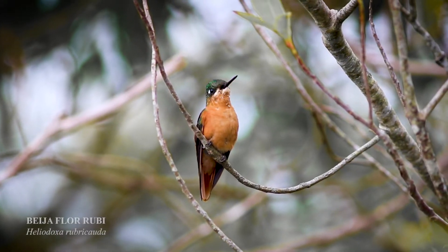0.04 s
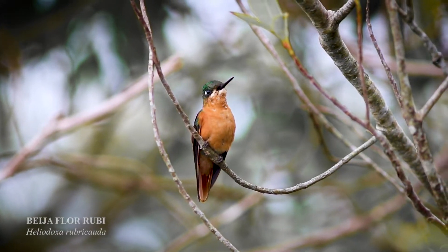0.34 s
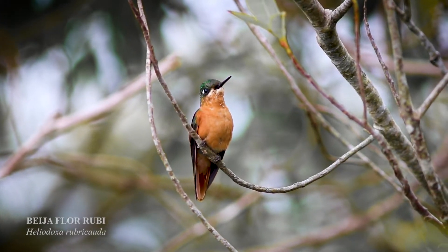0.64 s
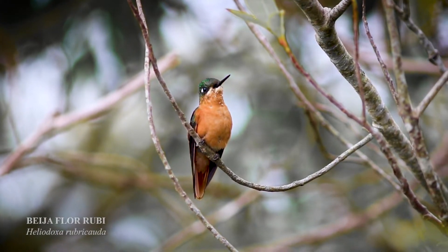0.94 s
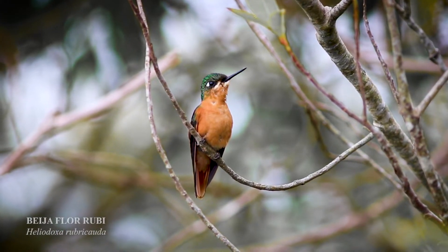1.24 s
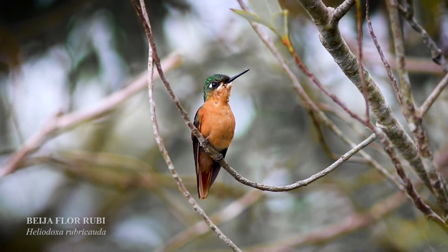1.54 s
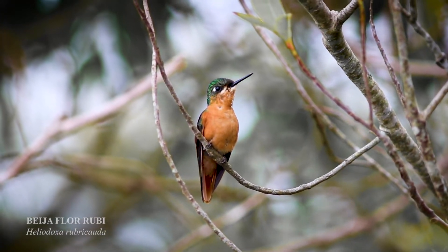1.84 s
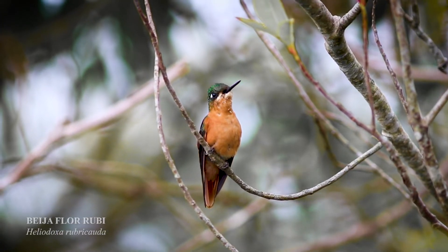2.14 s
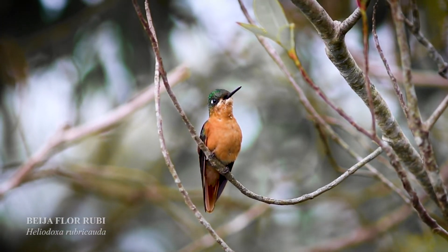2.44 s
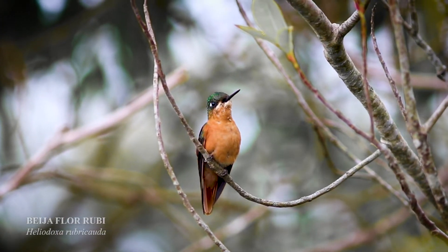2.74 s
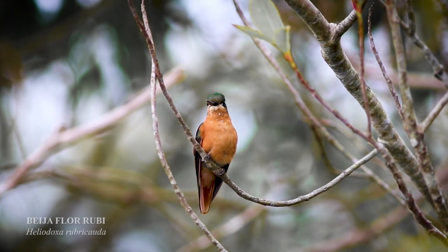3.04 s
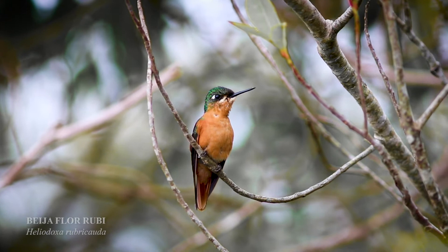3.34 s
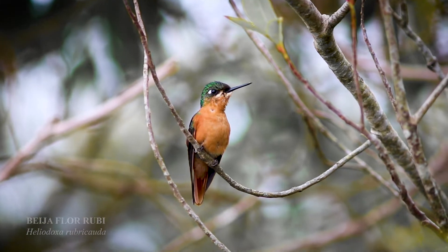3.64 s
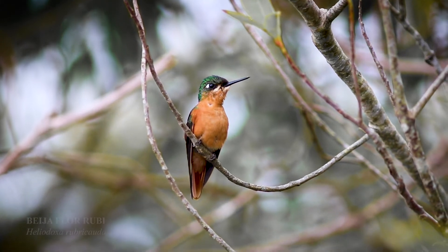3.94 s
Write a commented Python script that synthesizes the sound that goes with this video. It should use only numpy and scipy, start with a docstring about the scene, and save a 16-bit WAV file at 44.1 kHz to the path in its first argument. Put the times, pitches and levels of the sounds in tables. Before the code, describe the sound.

Insects rasp in a steady high chorus while a small bird warbles quickly.

```python
"""Insects and birds at a forest edge.

Insect stroke trains ring wing resonances near 4.6 and 6.5 kHz; crickets add thin pulsed trills.
A small bird warbles quick glides, a farther one chirps high, one call buzzes. Twigs tick, leaves rustle.
Trees scatter the calls over a wash of distant air and two faint tones that fade early. Almost mono."""
import sys
import numpy as np
from scipy import signal
from scipy.fft import rfft, irfft
from scipy.io import wavfile
from scipy.ndimage import uniform_filter1d

SR = 44100
rng = np.random.default_rng(int(sys.argv[2]) if len(sys.argv) > 2 else 0)


def transcribe(u):
    """Save the signal u as a 16-bit wav file named by the first command-line argument.

    u: samples, shape (n,) or (channels, n), limited to [-1, 1]; the rate is SR.
    q: integer samples, one column per channel.
    """
    v = np.clip(np.atleast_2d(u).T, -1, 1)
    q = np.round(v * 32767).astype(np.int16)
    wavfile.write(sys.argv[1], SR, q)


N = 176400

# distant air and hiss: freq_hz, gain_db
AIR_SPECTRUM = [(25, -22), (55, -24), (90, -11), (130, -4), (200, 1.5), (350, 1), (700, -1.5), (1500, -2),
                (2800, -2.5), (5500, -2.5), (7500, -6.5), (8500, -7.5), (9150, -4.5), (10200, -10),
                (12000, -11), (14200, -6), (15300, -15)]
# air, side relative to mid: freq_hz, gain_db
AIR_SIDE_SPECTRUM = [(30, -4), (120, -20), (300, -20.5), (700, -15), (2800, -17), (4500, -57), (15000, -33)]
# deep rumble: freq_hz, gain_db
RUMBLE_SPECTRUM = [(10, -10), (25, -6), (50, -2), (80, 4), (130, -24), (400, -60)]
# faint far tones: pitch_hz, end_s, level_db
FADING_TONES = [(561, 0.56, -59.5), (1340, 0.65, -60)]
# rasping insects: stroke_rate_hz, relative_db
RASPING_INSECTS = [(33.65, -9), (77.4, -6), (96.6, -12), (58.72, -5.5), (169.45, -9)]
# wing resonance, low chorus: freq_hz, gain_db
LOW_WING_RESONANCE = [(4100, -35.5), (4290, -17), (4385, -6.5), (4440, -3.5), (4620, 1.5), (4830, -5.5),
                      (4920, -11), (5080, -26), (5300, -30.5)]
# wing resonance, high chorus: freq_hz, gain_db
HIGH_WING_RESONANCE = [(5700, -35), (6000, 0), (6130, -7), (6340, 4), (6630, 1), (6880, 0.5), (7050, -11),
                       (7500, -9), (7800, -30)]
# low chorus loudness: time_s, level_db
LOW_CHORUS_ENVELOPE = [(0, -36.5), (.6, -36), (1.4, -35.5), (1.9, -37), (2.6, -37.6), (2.82, -33.5),
                       (3.2, -35), (3.48, -34.5), (3.66, -40), (3.82, -34), (3.92, -41.5)]
# cricket trills: pitch_hz, pulse_rate_hz, level_db
CRICKET_TRILLS = [(4444, 10.3, -44.5), (4615, 34, -44), (5310, 28, -66), (6014, 17, -58), (6335, 40, -60),
                  (6868, 22, -62), (7390, 30, -66), (9260, 45, -64)]
# warbled notes: start_s, length_s, start_hz, middle_hz, end_hz, relative_db
WARBLE_NOTES = [ (0.19, 0.036, 3230, 2900, 2550, -52), (0.26, 0.057, 2680, 3370, 3500, -48),
                (0.366, 0.052, 2270, 2700, 2450, -47), (0.427, 0.041, 3300, 2950, 2320, -46.5),
                (0.551, 0.061, 2680, 3460, 2700, -46), (0.601, 0.051, 2700, 2455, 3640, -45.5),
                (0.777, 0.043, 2010, 2800, 2200, -43.5), (0.864, .058, 2720, 3280, 4050, -44.5),
                (0.958, 0.043, 3690, 2920, 2150, -41.5), (1.013, 0.032, 2260, 2730, 3100, -43.5),
                (1.108, 0.062, 2510, 3130, 2210, -40.5), (1.18, 0.043, 3100, 3600, 3670, -44.5),
                (1.379, 0.034, 2330, 2880, 3420, -39.5), (1.427, 0.034, 3210, 2830, 2200, -38),
                (1.478, 0.049, 3350, 3410, 3880, -43), (1.67, 0.045, 1760, 2620, 1920, -40.5),
                (1.797, 0.043, 3190, 2895, 2290, -38), (1.857, 0.028, 3200, 2495, 3130, -48),
                (1.881, 0.039, 3280, 3560, 3700, -42.5), (1.983, 0.025, 3300, 2840, 2250, -44.5),
                (2.005, 0.027, 2360, 2860, 3170, -41.5), (2.115, 0.046, 2475, 3090, 2950, -41.5),
                (2.151, 0.039, 3090, 2820, 3100, -37.5), (2.313, 0.038, 1980, 2680, 1920, -41),
                (2.345, .024, 2000, 2935, 3330, -40.5), (2.405, 0.022, 3200, 2990, 2330, -40),
                (2.431, 0.054, 2400, 3110, 2380, -39), (2.606, .042, 1910, 2390, 1900, -49.5),
                (2.69, 0.033, 3080, 2900, 2250, -41), (2.732, .068, 2345, 3225, 2400, -43.5),
                (2.802, 0.021, 2290, 2520, 2580, -41.5), (2.937, 0.03, 2080, 2630, 2200, -39),
                (2.97, 0.025, 2500, 3000, 3100, -42), (3.022, 0.023, 2780, 2960, 2380, -39),
                (3.059, 0.029, 2050, 2470, 3450, -43), (3.082, 0.043, 3390, 3446, 3780, -40),
                (3.296, .048, 1980, 2510, 1950, -44.5), (3.418, 0.034, 3030, 2850, 2420, -38.5),
                (3.468, 0.026, 2520, 2980, 2400, -40), (3.494, 0.034, 2574, 3220, 3440, -43),
                (3.754, 0.038, 2440, 2860, 3120, -49), (3.808, 0.019, 3070, 2730, 2380, -47),
                (3.845, 0.044, 2460, 3020, 3000, -48), (3.89, 0.026, 4300, 3850, 3300, -47)]
# soft low notes between phrases: start_s, pitch_hz, relative_db
MURMUR_NOTES = [(.725, 2000, -51), (1.30, 2200, -47), (1.615, 1856, -52.5), (2.56, 1750, -59),
                (2.90, 2010, -54), (3.245, 1850, -50.5), (3.675, 2190, -51)]
# warbler's direct sound, half hidden by leaves at first: time_s, gain_db
WARBLER_DIRECT_GAIN = [(.6, -1.5), (1.6, 0)]
# twig ticks and leaf rustles: start_s, rise_s, decay_s, level_db, body_relative_db
RUSTLE_BURSTS = [(.379, .0004, 0.0014, -29, -20), (.380, .001, .018, -40, -17),
                 (.648, 0.0055, .014, -42, -14), (.795, .006, .014, -44, -14), (.955, .012, .03, -43, -15),
                 (3.360, 0.0015, .016, -40, -1), (3.42, 0.031, 0.048, -43, 5.5)]
# bright crackle of a rustle: freq_hz, gain_db
RUSTLE_TREBLE_SPECTRUM = [(200, -45), (900, -12), (1700, -10), (4000, 2), (9000, 7), (12000, 5.5),
                          (16000, -20)]
# lower scratch of a rustle: freq_hz, gain_db
RUSTLE_BODY_SPECTRUM = [(600, -26), (1200, -4), (1700, -1), (4000, 1), (5500, -1), (9000, -35)]
# farther bird's rising chirps: start_s, start_hz, level_db
FAR_CHIRPS = [(.905, 4300, -47.5), (1.02, 5200, -46), (1.16, 6800, -52.5), (1.295, 5900, -52),
              (1.435, 7000, -49), (1.56, 7100, -49), (1.70, 7000, -53.5), (1.825, 5900, -52.5),
              (1.975, 6800, -53)]
# hardest strokes of a near insect: time_s, peak_db
SNAP_STROKES = [(1.352, -23.5), (1.960, -22.5), (2.590, -24.5), (2.611, -22), (2.824, -21.5),
                (2.835, -22.5)]


def undb(db):
    """Decibels to gain."""
    return 10 ** (np.asarray(db) / 20)


def unit(x):
    """Scale to rms 1."""
    return x / np.sqrt(np.mean(x ** 2))


def walk(rate_hz):
    """Smooth random drift, rms 1."""
    hold = max(2, int(SR / rate_hz))
    steps = np.repeat(rng.standard_normal(N // hold + 1), hold)
    return unit(uniform_filter1d(uniform_filter1d(steps, hold), hold)[:N])


def sine(hz):
    """Sine following a pitch curve."""
    return np.sin(2 * np.pi * np.cumsum(hz) / SR)


def colour(x, spectrum):
    """Filter through a curve of freq_hz, gain_db points."""
    hz, db = np.array(spectrum).T
    bin_hz = np.maximum(np.arange(N // 2 + 1) * SR / N, 1)
    return irfft(rfft(x) * undb(np.interp(np.log(bin_hz), np.log(hz), db)), N)


def scatter(x, t60_s=0.34):
    """Diffuse echo from trunks and leaves, unit energy gain."""
    t = np.arange(SR // 2) / SR
    tail = rng.standard_normal(len(t)) * np.exp(-np.log(1000) * t / t60_s)
    return irfft(rfft(x) * rfft(tail / np.linalg.norm(tail), N), N)


def blur(x, echo_db):
    """Blend in the tree echo at about constant power."""
    return (x + undb(echo_db) * scatter(x)) / np.hypot(1, undb(echo_db))


def stereo(mid, side):
    """Mid and side to left and right."""
    return np.array([mid + side, mid - side])


def add(out, start_s, x):
    """Mix in a short sound."""
    i = max(0, int(start_s * SR))
    out[i:i + len(x)] += x[:max(0, N - i)]


def air(wash_db=-41.5, rumble_db=-73):
    """Far wash and hiss over a deep rumble, opposite in the two ears."""
    mid = undb(wash_db) * unit(colour(rng.standard_normal(N), AIR_SPECTRUM))
    side = undb(wash_db) * unit(colour(rng.standard_normal(N), AIR_SPECTRUM))
    rumble = undb(rumble_db) * unit(colour(rng.standard_normal(N), RUMBLE_SPECTRUM))
    return stereo(mid, colour(side, AIR_SIDE_SPECTRUM) + rumble)


def far_tones(t, waver=0.0114, fade_s=0.14):
    """Faint wavering tones sink into the air."""
    out = np.zeros(N)
    for hz, end_s, db in FADING_TONES:
        fade = np.clip((end_s - t) / fade_s, 0, 1)
        out += undb(db) * fade * unit(sine(hz * (1 + waver * walk(56.3))))
    return out


def chorus(wing, jitter=.07, spread_db=2.5, echo_db=5.5, max_strokes=1024):
    """Uneven stroke trains ring the wing resonance; each insect has its own path through the trees."""
    out = np.zeros(N)
    for rate_hz, db in RASPING_INSECTS:
        gap, size, offset = rng.standard_normal((max_strokes, 3)).T
        at_sample = (np.cumsum(1 + jitter * gap) - abs(offset[0])) / rate_hz * SR
        inside = (at_sample >= 0) & (at_sample < N)
        strokes = np.zeros(N)
        strokes[at_sample[inside].astype(int)] = undb(db + spread_db * size[inside])
        out += strokes + undb(echo_db) * scatter(strokes)
    return unit(colour(out, wing))


def crickets(rate_drift=0.0988, pitch_drift=.003):
    """Single crickets pulse on nearly pure, drifting pitches."""
    out = np.zeros(N)
    for hz, rate_hz, db in CRICKET_TRILLS:
        pulse_hz = rate_hz * (1 + rate_drift * walk(6))
        pulses = sine(pulse_hz / 2) ** 2
        tone = sine(hz * (1 + pitch_drift * walk(50)))
        out += undb(db) * unit(pulses * tone)
    return blur(out, echo_db=-8)


def whistle(length_s, pitches_hz, waver, attack_s=.007, release_s=.004, overtone_db=-26):
    """Near-sine bird note bending through three pitches."""
    t = np.arange(int(length_s * SR)) / SR
    glide_hz = np.polyval(np.polyfit([0, .5, 1], pitches_hz, 2), t / length_s)
    hz = glide_hz * (1 + waver[:len(t)])
    ramp = np.clip(np.minimum(t / attack_s, (length_s - t) / release_s), 0, 1)
    gate = np.sin(np.pi / 2 * ramp) ** 2
    return unit(gate * (sine(hz) + undb(overtone_db) * sine(2 * hz)))


def warbler(t, murmur_s=0.0403, murmur_rise=0.087, flutter_db=1.7, echo_db=-7.8, width=0.18, gain_db=-.3):
    """Quick, slightly rough glides with soft low notes between phrases."""
    song, waver = np.zeros(N), .013 * walk(500)
    for start_s, length_s, *pitches_hz, db in WARBLE_NOTES:
        add(song, start_s, undb(db) * whistle(length_s, pitches_hz, waver[int(start_s * SR):]))
    for start_s, hz, db in MURMUR_NOTES:
        pitches_hz = [hz * (1 - murmur_rise), hz, hz]
        add(song, start_s, undb(db) * whistle(murmur_s, pitches_hz, waver[int(start_s * SR):]))
    song *= undb(gain_db + flutter_db * walk(300))
    direct = song * undb(np.interp(t, *np.array(WARBLER_DIRECT_GAIN).T))
    return stereo(direct + undb(echo_db) * scatter(song), width * scatter(song))


def rustles(t, grain_db=4):
    """Crackly bursts from twigs and leaves, some with a lower scratch."""
    crackle = rng.standard_normal(N) * undb(grain_db * walk(2500))
    treble = unit(colour(crackle, RUSTLE_TREBLE_SPECTRUM))
    body = unit(colour(crackle[::-1], RUSTLE_BODY_SPECTRUM))
    out = np.zeros(N)
    for start_s, rise_s, decay_s, db, body_db in RUSTLE_BURSTS:
        rise = np.clip((t - start_s) / rise_s, 0, 1)
        decay = np.exp(-np.maximum(t - start_s - rise_s, 0) / decay_s)
        out += undb(db) * rise * decay * (treble + undb(body_db) * body)
    return out


def far_bird(length_s=.065, rise_hz=1800):
    """Thin, rough upward chirps, blurred by distance."""
    out, waver = np.zeros(N), .0312 * walk(700)
    for start_s, hz, db in FAR_CHIRPS:
        pitches_hz = [hz, hz + rise_hz / 2, hz + rise_hz]
        add(out, start_s, undb(db) * whistle(length_s, pitches_hz, waver[int(start_s * SR):]))
    return blur(out, echo_db=-2)


def snaps():
    """A near insect's hard single strokes ring the low wing resonance."""
    strokes = np.zeros(N)
    for time_s, peak_db in SNAP_STROKES:
        strokes[int(time_s * SR)] = undb(peak_db)
    ring_peak = colour(signal.unit_impulse(N), LOW_WING_RESONANCE).max()
    return colour(strokes, LOW_WING_RESONANCE) / ring_peak


def buzz(t, start_s=2.80, length_s=.18, pitch_hz=5000, arch_hz=170, shake_hz=95, depth=.029):
    """Far call; its pitch shakes fast and arches as it swells and fades."""
    swell = np.sin(np.pi * np.clip((t - start_s) / length_s, 0, 1))
    shake = np.sin(2 * np.pi * shake_hz * t) + .5 * walk(400)
    voice = sine((pitch_hz + arch_hz * swell) * (1 + depth * shake))
    return undb(-44.5) * swell * unit(voice + scatter(voice))


def scene():
    """Insects, birds and leaves over the air."""
    t = np.arange(N) / SR
    background = air() + far_tones(t)
    low_db = np.interp(t, *np.array(LOW_CHORUS_ENVELOPE).T) + .4 * walk(20)
    high_db = -45 - 1.5 * walk(7.23)
    rasp = undb(low_db) * chorus(LOW_WING_RESONANCE) + undb(high_db) * chorus(HIGH_WING_RESONANCE)
    return background + rasp + crickets() + warbler(t) + rustles(t) + far_bird() + snaps() + buzz(t)


def record(dry, cutoff_hz=15400):
    """Steep elliptic low-pass."""
    return signal.sosfilt(signal.ellip(10, .1, 80, cutoff_hz, fs=SR, output="sos"), dry)


dry = scene()
out = record(dry)
transcribe(out)
```